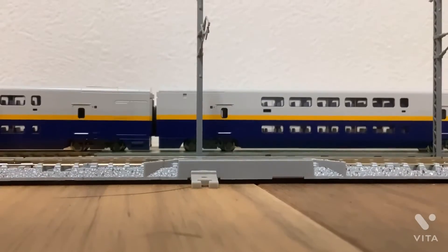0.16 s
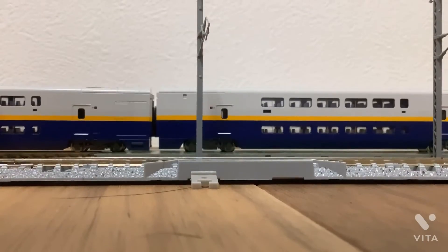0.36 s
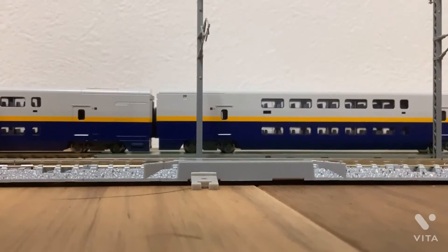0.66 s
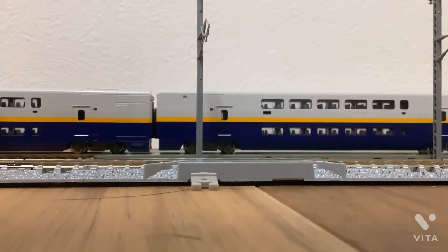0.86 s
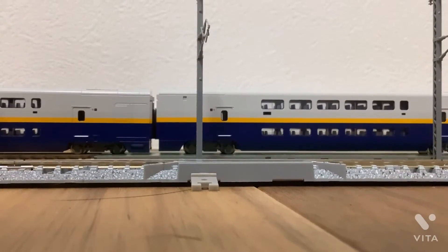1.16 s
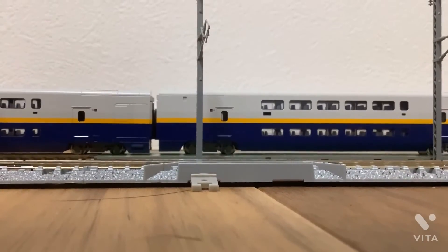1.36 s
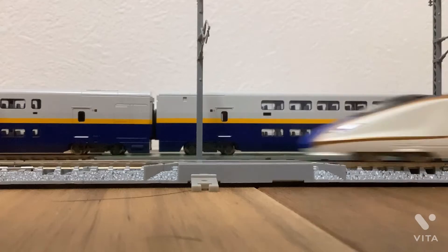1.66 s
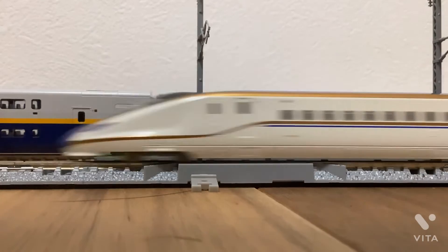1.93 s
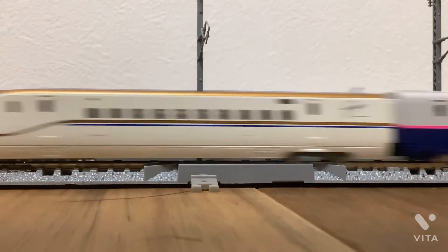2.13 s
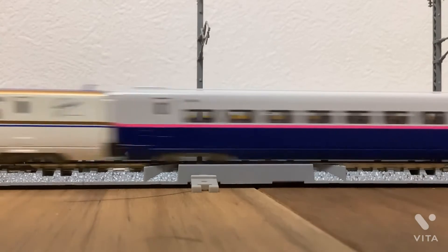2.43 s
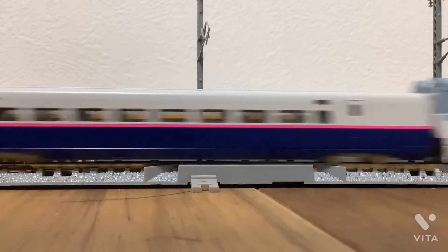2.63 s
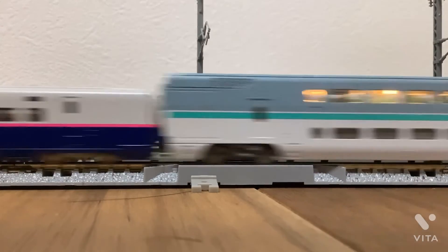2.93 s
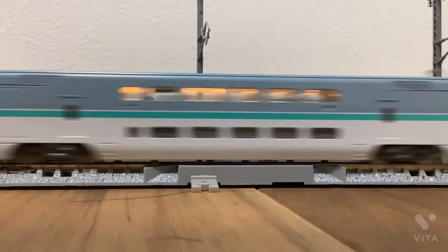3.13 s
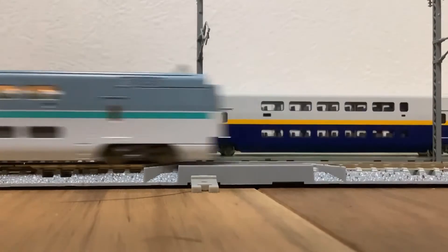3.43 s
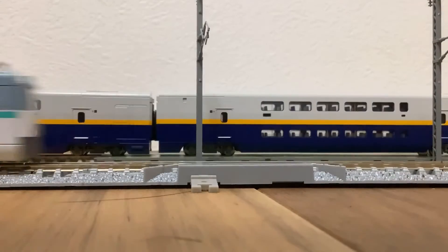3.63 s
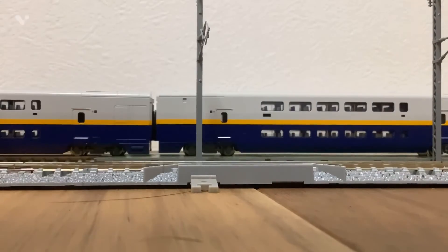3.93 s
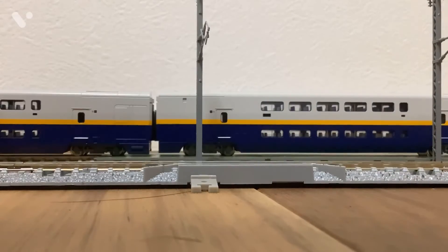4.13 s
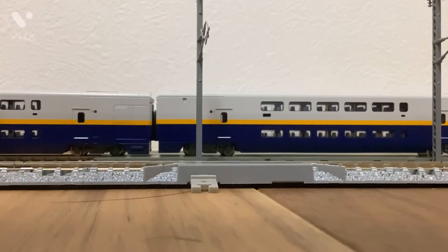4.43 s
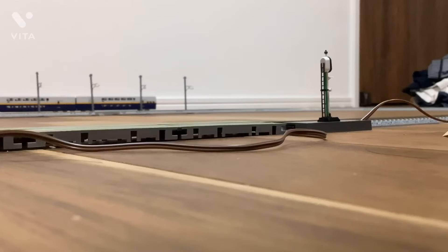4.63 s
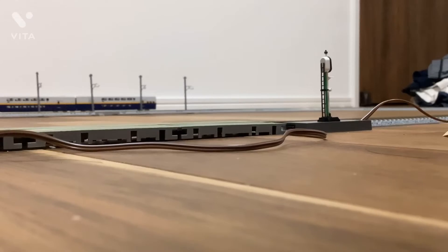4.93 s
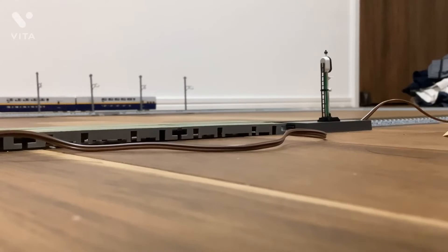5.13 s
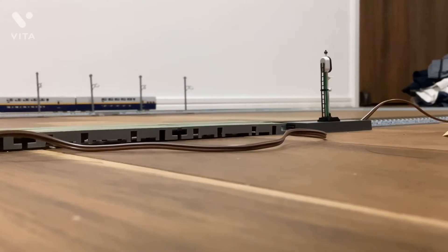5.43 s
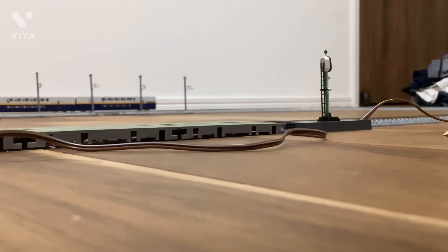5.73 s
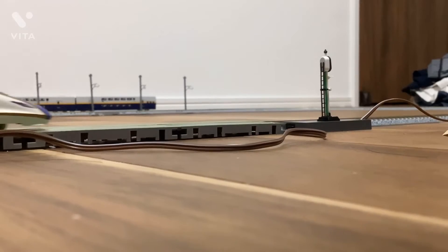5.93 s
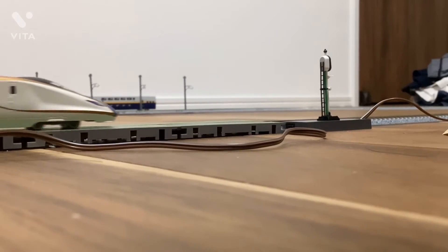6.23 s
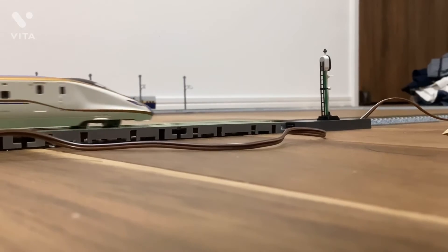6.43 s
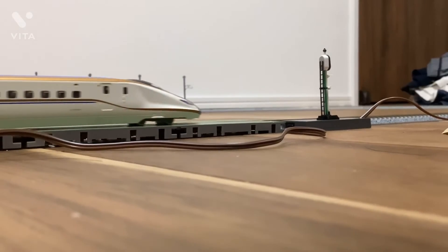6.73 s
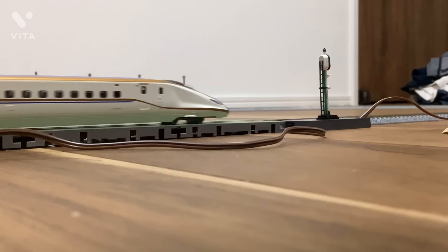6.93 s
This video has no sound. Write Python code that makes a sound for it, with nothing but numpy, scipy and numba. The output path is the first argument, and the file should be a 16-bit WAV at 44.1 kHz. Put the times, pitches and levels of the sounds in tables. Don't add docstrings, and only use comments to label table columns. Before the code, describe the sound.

A model train whirs past close by with a loud metallic hiss, then cuts to a fainter, steady rolling with small clicks indoors.

```python
import sys
import numpy as np
from scipy import signal
from scipy.fft import rfft, irfft, next_fast_len
from scipy.io import wavfile
from numba import njit

SR = 44100
rng = np.random.default_rng(int(sys.argv[2]) if len(sys.argv) > 2 else 0)


def bounce(signal):
    frames = np.transpose(np.atleast_2d(signal))
    limited = np.clip(frames, -1, 1)
    pcm = np.round(limited * 32767).astype(np.int16)
    wavfile.write(sys.argv[1], SR, pcm)


N = 311787

# time [s], shell level [dB], shell resonance [Hz],
# its ridge [dB], wheel level [dB].
CLOSE_PASS = [(0.0, -33, 1870, 1, -35.5), (0.04, -38, 1870, -1, -33), (0.1, -37.5, 1830, 4, -35.5),
              (0.88, -42, 2040, 2.5, -35.5), (1.2, -43.5, 1860, -3, -35.5), (1.22, -39, 1830, 0, -35.5),
              (1.54, -39, 1920, 1.5, -36), (1.91, -35, 1990, 4, -32.5), (2.6, -48, 1910, 16, -27.5),
              (2.79, -33, 1840, 1, -26.5), (2.81, -30, 1820, 3, -27.5), (2.85, -32.5, 1810, 6, -27),
              (3.07, -32.5, 1780, -2, -23.5), (3.55, -28.5, 1980, -2, -24.5), (3.69, -30, 1910, 1, -26),
              (3.72, -34, 1978, -5, -22), (3.75, -33, 1990, -1, -27), (3.86, -36, 2063, 1, -27),
              (3.91, -32.5, 2110, 2, -27), (3.93, -39, 2100, 3, -26), (4.3, -39.5, 2230, 3, -30.5),
              (4.57, -34, 2172, -1, -35.5)]
# time [s], whine [Hz], whine level [dB], growl level [dB], growl ridge [Hz],
# chafe level [dB].
MOTOR_GEARS = [(0.0, 580, -53, -54, 958, -51), (0.01, 576, -51, -45, 970, -51),
               (0.36, 598, -52, -42, 890, -44), (0.5, 564, -52, -48, 947, -55),
               (0.58, 557, -44, -53, 991, -51), (0.7, 545, -47, -47, 979, -49),
               (0.85, 572, -55, -49.5, 939, -56), (0.99, 601, -50, -47.5, 840, -41),
               (1.09, 593, -56, -49, 891, -51), (1.2, 596, -48, -48, 987, -54),
               (1.44, 584, -63, -49.5, 950, -59), (1.65, 564, -56, -47.5, 1093, -57),
               (2.16, 573, -58, -46.5, 1070, -60), (2.24, 561, -47, -44, 1050, -60),
               (2.42, 555, -53.5, -47, 1040, -51.5), (2.62, 546, -55, -45, 1020, -54),
               (3.18, 562.6, -44, -42.5, 1108, -50), (3.89, 555, -46, -46.5, 1100, -49.5),
               (4.01, 575, -53, -44, 1140, -53), (4.2, 560, -49, -45, 1150, -54),
               (4.39, 545, -44, -47.5, 1090, -51), (4.57, 547, -45.5, -48, 1130, -53)]
# frequency [Hz], level [dB per Hz].
TOP_AIR = [(6940, -12), (11800, -2.5), (12600, -8.5), (14500, -3), (15200, -2), (15900, -2)]


def from_db(db):
    return np.exp(np.asarray(db) * np.log(10) / 20)


def rms_one(x):
    return x / np.sqrt(np.mean(x ** 2) + 1e-20)


def in_time(rows):
    s, *columns = np.transpose(rows)
    return [np.interp(np.arange(N) / SR, s, c) for c in columns]


def colour(x, points):
    hz, db = np.transpose(points)
    size = next_fast_len(N)
    log_hz = np.log(np.arange(size // 2 + 1) * SR / size + 1e-9)
    gain = from_db(np.interp(log_hz, np.log(hz), db, -90, -90))
    return rms_one(irfft(rfft(x, size) * gain, size)[:N])


def drift(rate_hz):
    r = np.exp(-80 * np.pi * rate_hz / SR)
    slow = signal.lfilter([1], [1, -2 * r, r * r], rng.standard_normal(N // 40 + 2002))[2000:]
    return np.interp(np.arange(N) / 40, np.arange(len(slow)), rms_one(slow))


@njit
def sweep(x, cosine, r):
    y = np.zeros(len(x))
    for i in range(2, len(x)):
        drive = (1 - r[i] ** 2) / 2 * (x[i] - x[i - 2])
        y[i] = drive + 2 * r[i] * cosine[i] * y[i - 1] - r[i] ** 2 * y[i - 2]
    return y


def resonance(x, hz, width_hz):
    return rms_one(sweep(x, np.cos(2 * np.pi * hz / SR), np.exp(-np.pi * width_hz / SR) * np.ones(N)))


def close_train():
    turn, depth_db = wheel_turn()
    throb_db = depth_db * turn
    chatter_db = 1.0 * drift(45) + 0.38 * drift(300)
    rolling = moving_echoes(roughness(2.67), echo_db=-17.5, slide_ms_per_s=.8)
    return (ringing_shell(rolling, throb_db, chatter_db)
            + ringing_wheels(rolling, throb_db, chatter_db)
            + pick_up_hiss(rolling, throb_db, chatter_db)
            + gear_growl(rolling)
            + gears(turn))


def roughness(grain_db):
    return rng.standard_normal(N) * from_db(grain_db * np.minimum(rng.exponential(1, N), 5))


def moving_echoes(x, echo_db, slide_ms_per_s, count=6):
    at, out = np.arange(N), x.copy()
    for spread, slide in rng.uniform(0, 1, (count, 2)):
        lag = (.001 + .012 * spread) * SR + (.4 + slide) * slide_ms_per_s * at / 1000
        out += from_db(echo_db) * x[np.clip(at - lag.astype(int), 0, N - 1)]
    return out / np.sqrt(1 + count * from_db(2 * echo_db))


def wheel_turn():
    # time [s], wheel turns [per s], throb depth [dB].
    turn_rows = [
        (0, 11.85, .4),
        (2.3, 11.85, .5),
        (2.6, 11.85, 1.3),
        (3.3, 11.85, 1.1),
        (3.85, 11.85, 2.0),
        (4.05, 11.55, 1.7),
        (4.57, 11.5, 1.0),
    ]
    per_s, depth_db = in_time(turn_rows)
    turns = np.cumsum(per_s) / SR
    peak_s = 2.5506
    return np.cos(2 * np.pi * (turns - turns[round(peak_s * SR)])), depth_db


def ringing_shell(rolling, throb_db, chatter_db):
    # frequency [Hz], level [dB per Hz].
    shell_spectrum = [(650, -57), (1100, -13), (1290, -14.5), (1390, -7.5), (1550, 0), (1820, -1.5),
                      (2460, -8), (2900, -15), (3770, 16), (6380, -120)]
    # time [s], frequency [Hz], level [dB].
    flank_rows = [(0.0, 1650, -11), (0.38, 1770, -6), (1.03, 1600, 5.5), (1.69, 1650, -3),
                  (2.35, 1614, 2.5), (2.74, 1690, 5), (3.4, 1557, 4), (3.63, 1700, 2.5), (4.57, 1600, -11)]
    shell_db, shell_hz, ridge_db, _ = in_time(CLOSE_PASS)
    flank_hz, flank_db = in_time(flank_rows)
    shell = colour(rolling, shell_spectrum)
    ridge = resonance(resonance(shell, shell_hz, 390), shell_hz, 600)
    flank = resonance(shell, flank_hz, 320)
    shell = rms_one(shell + from_db(ridge_db) * ridge + from_db(flank_db) * flank)
    return from_db(shell_db + 0.1 * throb_db + 0.21 * chatter_db + 0.37 * drift(10.6)) * shell


def ringing_wheels(rolling, throb_db, chatter_db):
    # frequency [Hz], level [dB per Hz].
    wheel_spectrum = [(1500, -3), (2400, 0.5), (2900, 2.5), (3500, -1.5), (4200, 1.5), (5000, -1.5),
                      (5900, -1.5), (6150, -7.5), (6400, -27), (6800, -22), (8500, -37)]
    # time [s], low ring [Hz], its level [dB],
    # high ring [Hz], its level [dB].
    ring_rows = [(0.0, 3450, -5.5, 5140, -7), (0.44, 3940, -6, 4670, -6), (0.65, 3550, -4, 5040, -4),
                 (0.85, 4070, -9, 5250, 1), (1.03, 4040, -4, 4990, -8), (1.14, 3840, -7, 4820, -6),
                 (1.41, 4080, -9, 4820, -9), (1.7, 3460, -9, 4900, -7), (1.77, 3680, -8, 4930, -4),
                 (2.04, 3200, -5.5, 4760, -14), (2.12, 3530, -6, 4760, -12), (2.24, 3280, -5, 5100, -7),
                 (2.47, 3770, -5, 4860, -15), (2.63, 3587, -6, 5140, -7), (2.97, 3910, -5.5, 4618, -6.5),
                 (4.02, 3760, -5.5, 4550, -6), (4.14, 3340, -4, 4560, -8), (4.49, 3200, -2.5, 4674, -11),
                 (4.57, 3440, -4, 4950, -19)]
    # frequency [Hz], width [Hz], level [dB].
    mode_rows = [(3760, 240, -10.5), (4560, 150, -10), (5250, 190, -18.5)]
    _, _, _, wheel_db = in_time(CLOSE_PASS)
    low_hz, low_db, high_hz, high_db = in_time(ring_rows)
    wheels = colour(rolling, wheel_spectrum)
    near = from_db(1.8 * np.minimum(wheel_db - np.percentile(wheel_db, 85), 0))
    modes = sum(from_db(db + 4.8 * drift(3.6)) * resonance(wheels, np.full(N, hz), width_hz)
                for hz, width_hz, db in mode_rows)
    low = from_db(low_db) * resonance(wheels, low_hz, 370)
    high = from_db(high_db) * resonance(wheels, high_hz, 360)
    wheels = rms_one(wheels + near * modes + low + high)
    return from_db(wheel_db + throb_db + chatter_db + 0.13 * drift(3.3)) * wheels


def pick_up_hiss(rolling, throb_db, chatter_db):
    # frequency [Hz], level [dB per Hz].
    hiss_spectrum = [(3530, -22), (6000, -2), (6470, -5), (7370, -0.5), (10500, -1.5), (12800, -5.5),
                     (16600, -42), (22000, -120)]
    # time [s], hiss level [dB], ridge [Hz], ridge level [dB], top air relative to hiss [dB],
    # air ridge [Hz].
    slide_rows = [(0.0, -33, 9870, -4, -14, 13300), (0.1, -36.5, 9750, -2, -15, 13600),
                  (0.41, -35, 9860, 3.5, -12, 13700), (0.84, -34, 10350, 0.5, -9.5, 13300),
                  (1.5, -33.5, 10300, 1.5, -10, 14200), (1.92, -31.5, 10400, 3, -11, 13400),
                  (2.26, -32, 10600, 5.5, -11, 13400), (2.71, -25.5, 9680, -10, -26, 14100),
                  (2.95, -29, 8700, -5, -18, 14000), (3.16, -31, 11000, -6, -12, 14100),
                  (3.28, -31.5, 10200, -7, -8, 14200), (3.41, -32, 10600, 4.5, -7.5, 13700),
                  (3.59, -33, 10500, 2, -6, 13900), (3.72, -37, 10300, 9.5, 3, 13200),
                  (3.84, -34, 9600, -1, -5, 13500), (4.0, -33, 10600, -4, -0.5, 14000),
                  (4.03, -38.5, 10020, 10, 0, 13700), (4.17, -32.5, 8700, -9, -6, 13200),
                  (4.4, -35, 9300, 1, -11, 13900), (4.57, -35.5, 8940, 6, -3, 13500)]
    # time [s], glint [Hz], glint level [dB], cancelled band [Hz],
    # cancelled share [0-1].
    glance_rows = [(0, 11300, -13, 8000, 0), (2.8, 11000, -43, 10500, 0.05), (3.0, 11300, -8, 10000, 0.5),
                   (3.3, 11500, -15, 8450, 0.1), (3.8, 10300, -13, 8600, 0.2), (3.92, 11100, -8, 9300, 0.3),
                   (4.1, 12400, 2, 10300, 0.4), (4.12, 8500, -1, 10400, 0.4), (4.3, 8650, -12, 10740, 0.2),
                   (4.57, 9440, -26, 11360, 0.3)]
    hiss_db, ridge_hz, ridge_db, air_db, air_hz = in_time(slide_rows)
    glint_hz, glint_db, notch_hz, notch_share = in_time(glance_rows)
    hiss, air = colour(rolling, hiss_spectrum), colour(rolling, TOP_AIR)
    hiss = rms_one(hiss + from_db(ridge_db) * resonance(hiss, ridge_hz, 1350))
    hiss += from_db(glint_db) * resonance(hiss, glint_hz, 330)
    notch_r = np.full(N, np.exp(-np.pi * 1500 / SR))
    hiss -= np.clip(notch_share, 0, 1) * sweep(hiss, np.cos(2 * np.pi * notch_hz / SR), notch_r)
    air = rms_one(air + 0.47 * resonance(air, air_hz, 700))
    level_db = hiss_db + throb_db + 0.64 * chatter_db + 0.79 * drift(2.3)
    return from_db(level_db) * (hiss + from_db(air_db) * air)


def gear_growl(rolling):
    # frequency [Hz], level [dB per Hz].
    growl_spectrum = [(250, -24), (420, -11.5), (481, -12), (540, -5.5), (757, -8.5), (1270, -6),
                      (1400, -3.5), (1820, -58), (3080, -120)]
    _, _, growl_db, growl_hz, _ = in_time(MOTOR_GEARS)
    growl = colour(rolling, growl_spectrum)
    growl = rms_one(growl + 0.51 * resonance(growl, growl_hz, 220))
    return from_db(growl_db + 0.8) * growl


def gears(turn):
    # time [s], whine width [Hz].
    width_rows = [
        (0, 110),
        (1.5, 88.5),
        (2.2, 39.7),
        (4.57, 35.5),
    ]
    whine_hz, whine_db, _, _, chafe_db = in_time(MOTOR_GEARS)
    width_hz, = in_time(width_rows)
    grit = rng.standard_normal((2, N))
    whine = resonance(resonance(grit[0], whine_hz, width_hz), whine_hz, 1.3 * width_hz)
    mesh_hz = whine_hz * (1 + 0.01185 * drift(12) + 0.033 * turn)
    mesh = np.sin(2 * np.pi * np.cumsum(mesh_hz) / SR)
    whine = rms_one(whine + 60 / width_hz * mesh)
    chafe = resonance(resonance(grit[1], 1.087 * whine_hz, 130), 1.24 * whine_hz, 220)
    dip_db = 4.5 * turn * np.clip(45 / width_hz, 0, 1)
    return from_db(whine_db - 1.5 - dip_db) * whine + from_db(chafe_db - 2.0 + 1.8 * dip_db) * chafe


def far_train():
    # time [s], rolling level [dB], hiss level [dB], shell ring [Hz], its level [dB],
    # wheel ring [Hz], its level [dB].
    far_rows = [(4.68, -46.5, -54, 2160, -5, 3600, -6.5), (5.3, -43, -52.5, 2080, -10, 3760, -10.5),
                (5.51, -45, -53, 2190, -9, 4460, -9), (5.9, -47, -53, 2290, -7, 3980, -8),
                (6.19, -46, -53.5, 2320, -12, 4600, -10), (6.32, -43.5, -53, 2110, -25, 4040, -15),
                (6.44, -44.5, -53.5, 2190, -9, 4000, -10), (6.55, -46.5, -53, 2400, -2.5, 4350, -3),
                (6.88, -44.5, -53.5, 2180, -11, 4550, -5), (7.07, -46.5, -53.5, 2360, -8, 4440, -5)]
    # time [s], level [dB].
    overshoot_rows = [
        (4.575, -66),
        (4.586, -60),
        (4.597, -39),
        (4.615, -36),
        (4.645, -44),
        (4.66, -56),
        (4.70, -54),
        (4.74, -81),
    ]
    # frequency [Hz], level [dB per Hz].
    roll_spectrum = [(240, -31), (400, -8.5), (700, -1), (1200, 1), (1330, 0), (1820, 2), (2020, -1),
                     (3050, 3.5), (3590, -1.5), (5150, -6), (6500, -33), (8450, -48), (14300, -120)]
    hiss_spectrum = [(3290, -12), (5600, 1.5), (6380, -1.5), (8970, 2), (13300, -16.5), (15000, -16),
                     (15900, -26)]
    roll_db, hiss_db, shell_hz, shell_db, wheel_hz, wheel_db = in_time(far_rows)
    over_db, = in_time(overshoot_rows)
    chatter_db = 1.0 * drift(17) + 0.86 * drift(150)
    rolling = moving_echoes(roughness(2.5), echo_db=-18.5, slide_ms_per_s=0.87)
    roll, hiss = colour(rolling, roll_spectrum), colour(rolling, hiss_spectrum)
    ring = resonance(roll, np.full(N, 3600.), 900)
    air = colour(rolling, TOP_AIR)
    shell_ring = from_db(shell_db) * resonance(roll, shell_hz, 410)
    wheel_ring = from_db(wheel_db) * resonance(roll, wheel_hz, 440)
    burst = 0.16 * roll + 0.91 * ring + 0.54 * hiss + 0.1 * air
    return (from_db(roll_db - 2.24 + chatter_db + 0.24 * drift(7.2)) * rms_one(roll + shell_ring + wheel_ring)
            + from_db(hiss_db + 0.1 + chatter_db + 0.3 * drift(12)) * hiss
            + from_db(over_db) * burst)


def joints():
    # time [s], peak level [dB], ring [Hz], relative rattle [dB], floor echo [dB], brightness [dB].
    joint_rows = [(4.8542, -28.5, 4450, -1, 0, 2), (4.9926, -30, 4100, -5, 6, -12),
                  (5.2724, -38, 4310, -2, -2, 6), (5.2994, -37, 3830, -4, -2, 4),
                  (5.3443, -35, 4450, -7, 0, -4), (5.3607, -30.5, 4370, 2, 0, 0),
                  (5.4094, -41, 3800, 0, -2, 0), (5.5046, -22.5, 4600, 4, 0.5, -5),
                  (5.6092, -30, 4610, 0, -2, 0), (5.8194, -34, 5320, 0, -2, 0),
                  (5.9344, -40, 4920, 0, -2, 0), (5.9609, -28.5, 4130, -2, 3, 1),
                  (6.0082, -25.5, 4400, 0, 1, -8), (6.1654, -26, 5060, 5, -4, 0),
                  (6.2791, -32, 5250, 2, -5, 2), (6.2874, -36, 4520, 2, -2, 0),
                  (6.3974, -28.5, 4010, 7, -5, -2), (6.447, -30, 5160, -3, -2, -3),
                  (6.5044, -43, 5140, 0, -2, 0), (6.5575, -24.5, 4200, 6.5, -0.5, -6),
                  (6.6069, -43, 5340, 0, 0, 6), (6.7181, -28, 4450, 4, -2, 0),
                  (6.8866, -26.5, 4700, 4, -6, 2), (6.9182, -23, 4400, 1, -7, -6)]
    # frequency [Hz], level [dB].
    body_spectrum = [(1200, -10), (2500, -13), (5000, -3), (7000, -5.5), (10000, -22)]
    top_spectrum = [(5000, -22), (8000, -1), (10000, 1), (12000, -10), (15800, -17)]
    ring, body, top = np.zeros((3, N + 2000))
    t, noise = np.arange(600) / SR, rng.standard_normal((len(joint_rows), 2, 600))
    for (s, peak_db, hz, rattle_db, echo_db, bright_db), pair in zip(joint_rows, noise):
        for lag_s, db, grit in zip((0, .0028), (0, echo_db), pair):
            at = round((s + lag_s) * SR)
            hit_db = peak_db + db
            ring[at:at + 600] += from_db(hit_db - 8.5 - 60 * t / 0.011) * np.sin(2 * np.pi * hz * t)
            body[at:at + 600] += from_db(hit_db + rattle_db - 15.0 - 60 * t / 0.014) * grit
            top[at:at + 600] += from_db(hit_db + bright_db - 13.0 - 60 * t / 0.011) * grit
    rattle = colour(body[:N], body_spectrum) * np.std(body[:N])
    bright = colour(top[:N], top_spectrum) * np.std(top[:N])
    return ring[:N] + rattle + bright


def room_tone():
    # frequency [Hz], level [dB].
    hum_rows = [(59.2, -50), (118.4, -55.5)]
    # frequency [Hz], level [dB per Hz].
    rumble_spectrum = [(18, -36), (30, -34), (42, -28), (59, -1.5), (108, 0), (126, -10), (140, -10.5),
                       (161, -10.5), (200, -17), (257, -15.5), (326, -20.5), (451, -20), (520, -19.5),
                       (680, -44), (1140, -120)]
    t = np.arange(N) / SR
    hum = sum(from_db(db + 5.0 + 0.5 * drift(1.05)) * np.sin(2 * np.pi * hz * t) for hz, db in hum_rows)
    return hum + from_db(-44.5) * colour(rng.standard_normal(N), rumble_spectrum)


def scene():
    change_s, far_room_db = 4.5745, -4
    room = room_tone()
    close_view = close_train() + room
    far_view = far_train() + joints() + from_db(far_room_db) * room[::-1]
    return np.where(np.arange(N) / SR < change_s, close_view, far_view)[None]


def band_limit(x):
    return signal.sosfilt(signal.butter(12, 16440, fs=SR, output="sos"), x)


def record(dry):
    top_cut = signal.ellip(12, .3, 80, 15780, fs=SR, output="sos")
    return band_limit(signal.sosfilt(top_cut, dry))


dry = scene()
out = record(dry)
bounce(out)
```